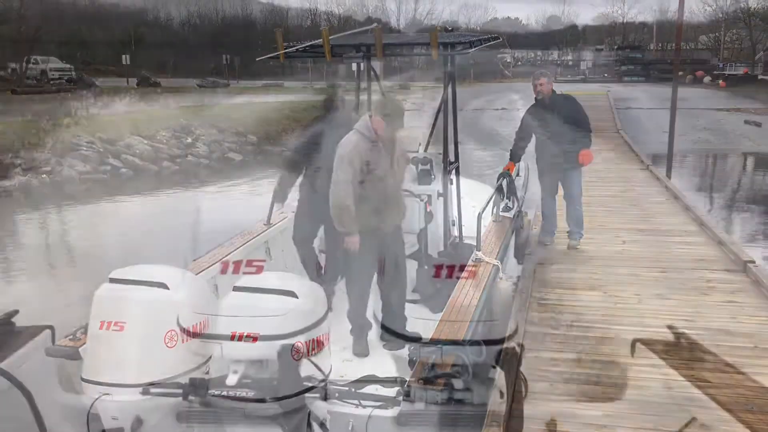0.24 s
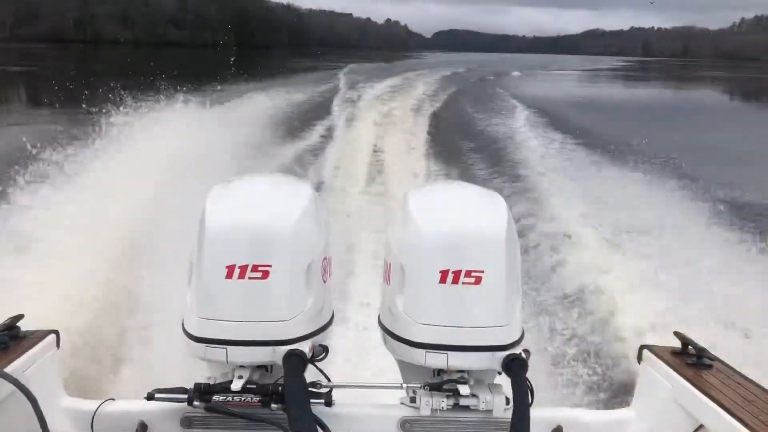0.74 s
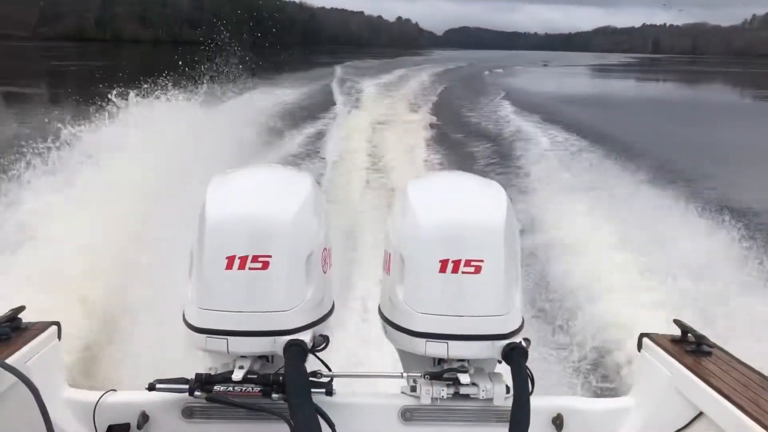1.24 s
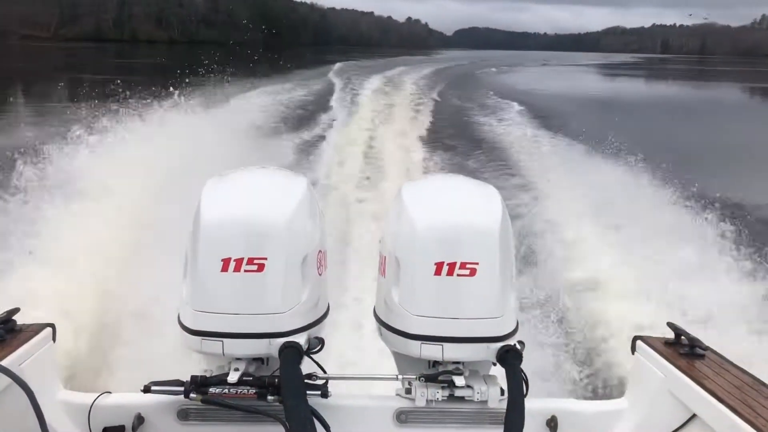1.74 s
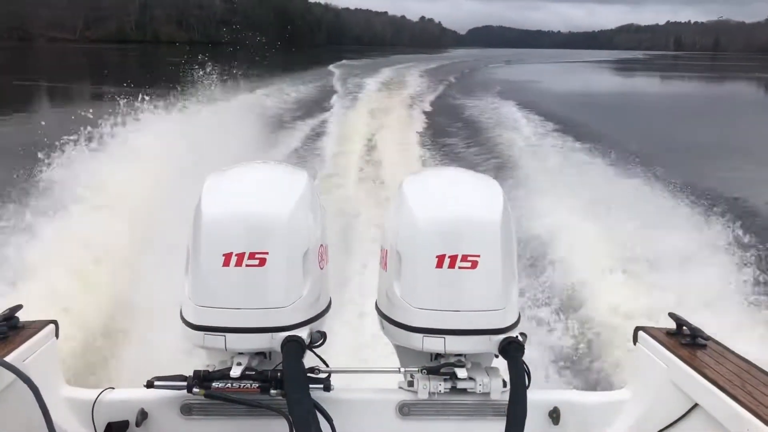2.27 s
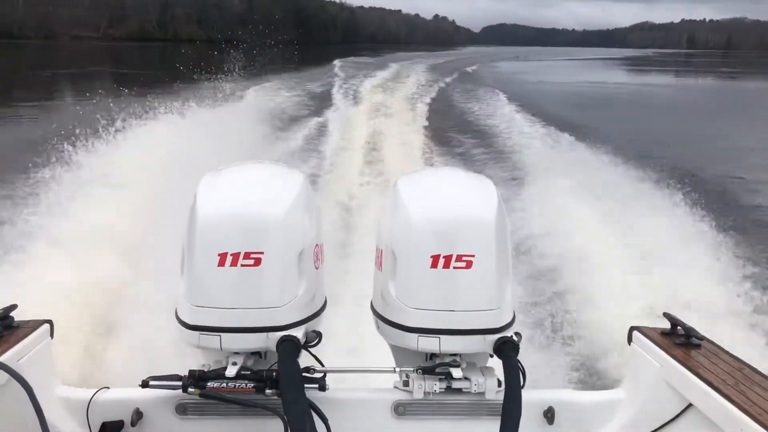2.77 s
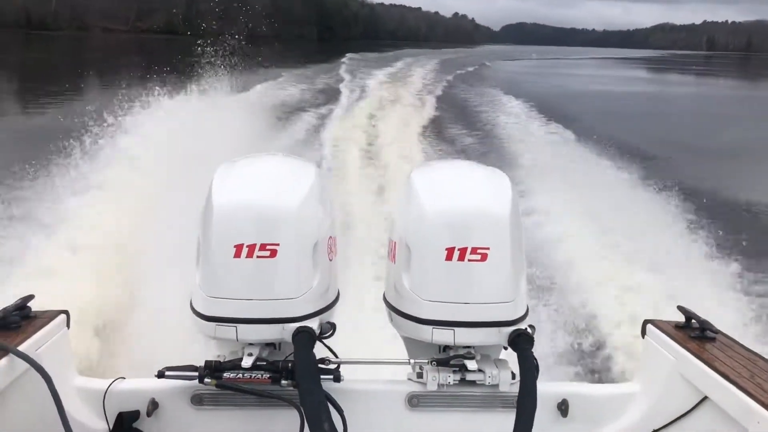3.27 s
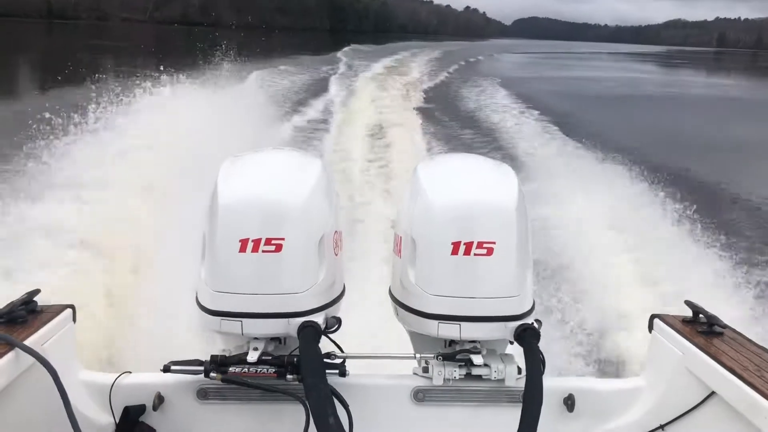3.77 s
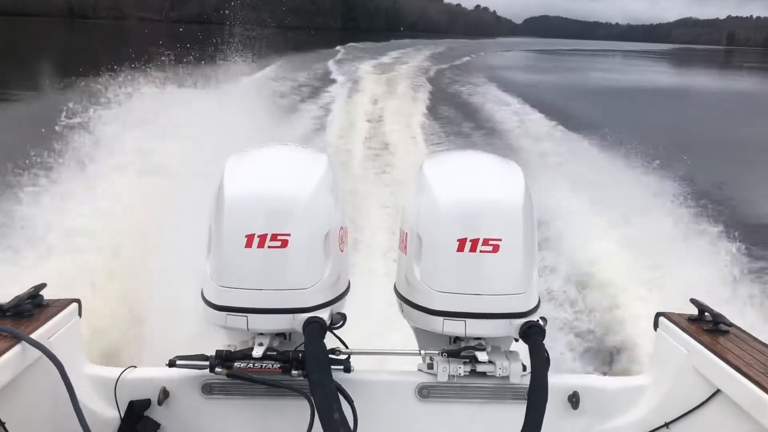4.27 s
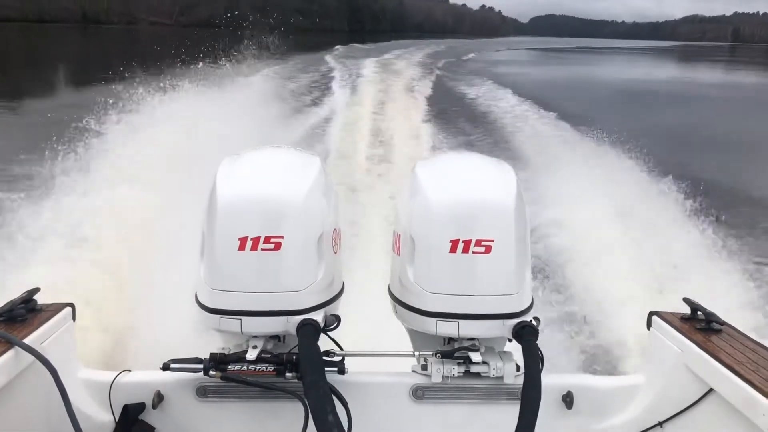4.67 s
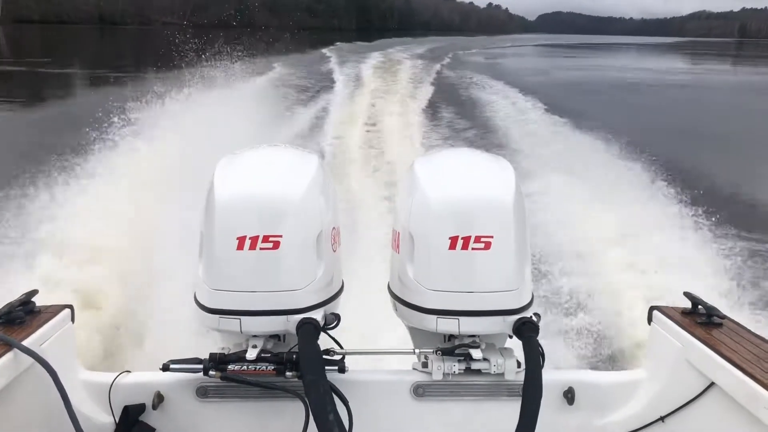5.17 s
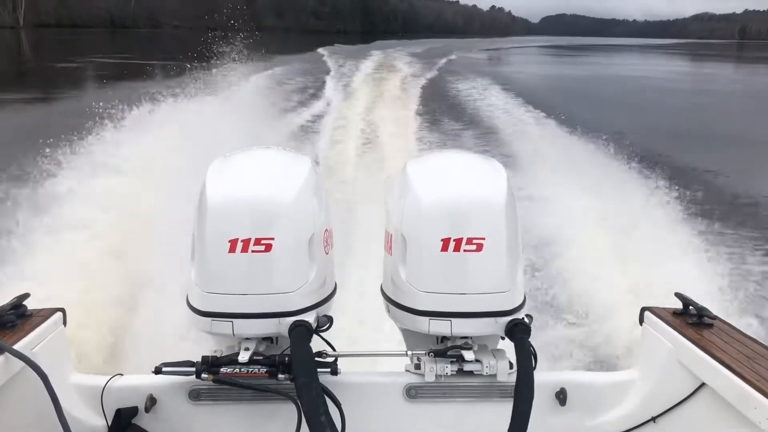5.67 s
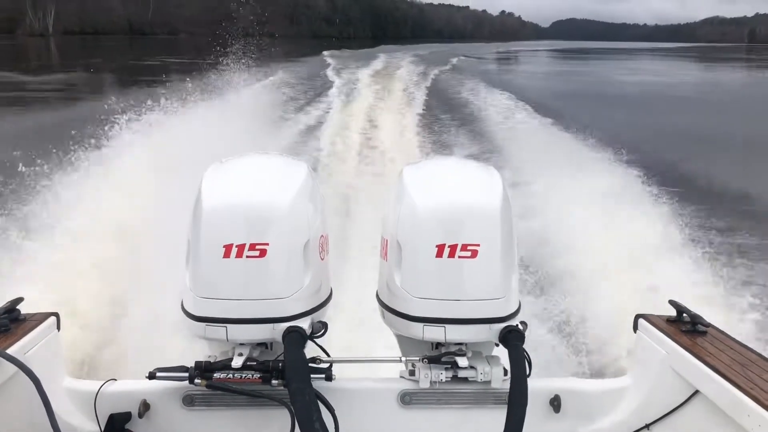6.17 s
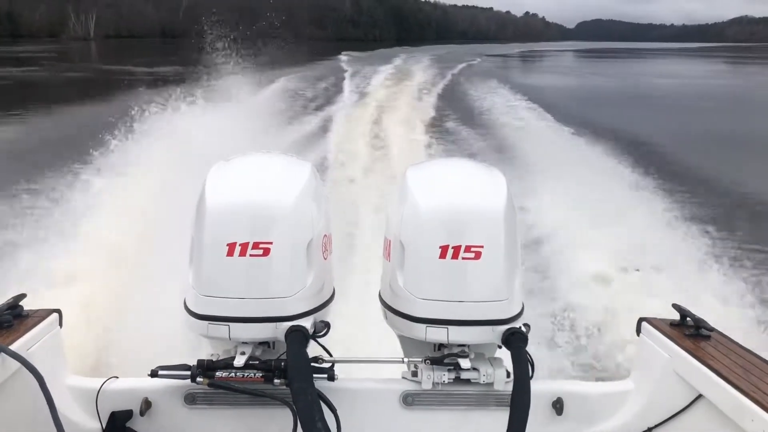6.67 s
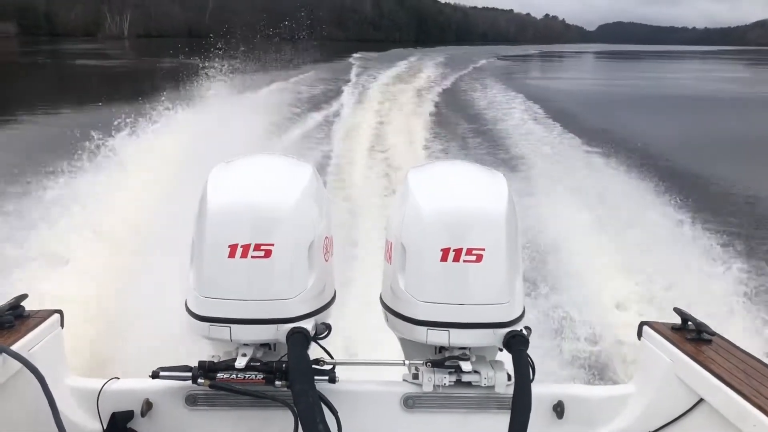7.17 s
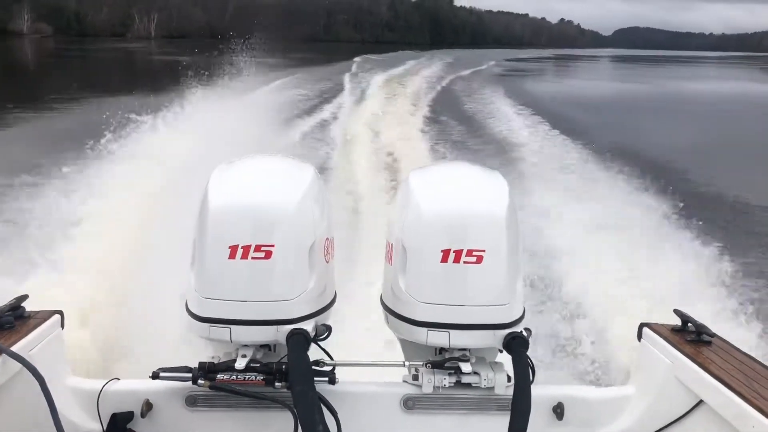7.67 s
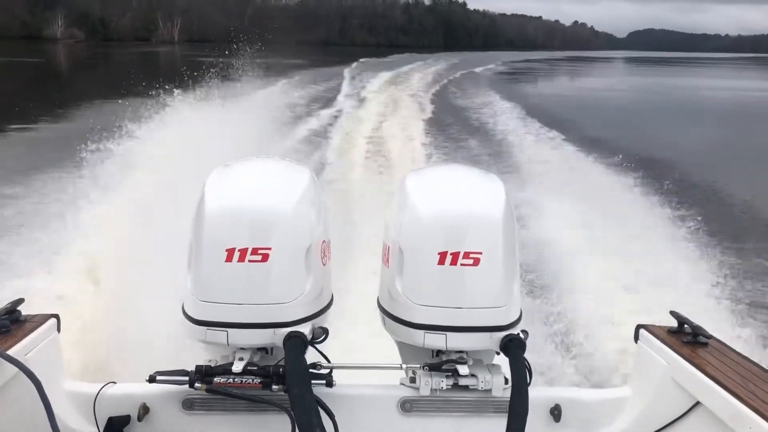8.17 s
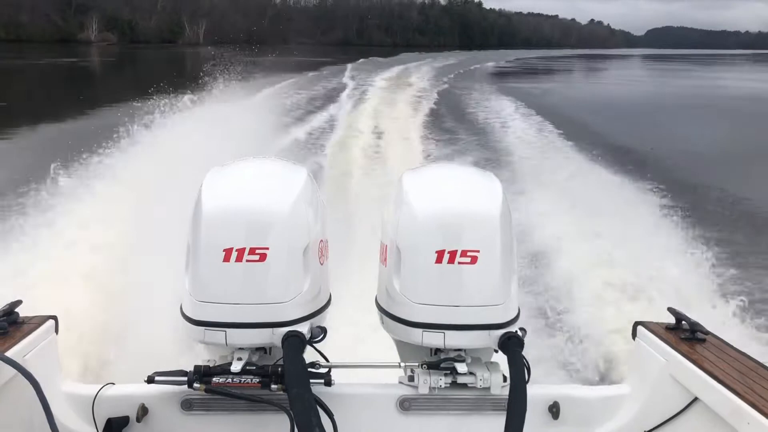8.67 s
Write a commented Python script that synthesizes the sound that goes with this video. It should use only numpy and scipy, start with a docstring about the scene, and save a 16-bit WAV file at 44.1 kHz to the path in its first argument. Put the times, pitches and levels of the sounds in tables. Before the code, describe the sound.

Two outboard motors run hard on a moving boat, heard close on deck. Their low drone quickly swells in, throbbing about once a second as slightly different pitches beat. Wash roars and spray hisses around a raspy mechanical buzz. After about three seconds the machinery and water ease while the pitch creeps up. Wind thumps and flutters irregularly on the microphone.

```python
"""Two four-cylinder outboard motors drive a boat at speed, heard from on board.
The sound fades in over the first 0.7 s while the hull ploughs and the motors are heavily loaded; wind
buffets then set in. Around 3 s the hull lifts: machinery, wash and spray ease as the crank speed creeps up.
Throughout, exhaust tones of slightly unequal pitch beat about once a second, sums of crank orders make
the machinery, and filtered noise makes the wash, the spray hiss and the wind at the microphone."""
import sys
import numpy as np
from scipy import signal
from scipy.fft import rfft, irfft, next_fast_len
from scipy.io import wavfile

SR = 44100
rng = np.random.default_rng(int(sys.argv[2]) if len(sys.argv) > 2 else 0)


def wav_record(signal):
    """Record a signal, one row per channel, as 16-bit PCM in the file named by sys.argv[1]."""
    frames = np.transpose(np.atleast_2d(signal))
    bounded = np.clip(frames, -1, 1)
    # unit amplitude maps onto the largest positive 16-bit level
    quanta = np.round(bounded * 32767).astype(np.int16)
    wavfile.write(sys.argv[1], SR, quanta)


N = 393813
TIME_S = np.arange(N) / SR
CYLINDER_FIRINGS = 4  # firings per crank turn


def from_db(db):
    """Level law: decibels to amplitude gain."""
    return 10 ** (np.asarray(db) / 20)


def rms_one(x):
    """Normalisation: scale to unit rms."""
    return x / np.sqrt(np.mean(x ** 2) + 1e-20)


def drift(rate_hz):
    """Low-passed noise: two equal poles at rate_hz leave a smooth random wander of unit rms."""
    step = 40  # samples between the points of the slow wander
    pole = np.exp(-2 * np.pi * rate_hz * step / SR)
    noise = rng.standard_normal(N // step + 2002)
    slow = signal.lfilter([1], [1, -2 * pole, pole ** 2], noise)[2000:]  # drop the filter's start
    return np.interp(np.arange(N) / step, np.arange(len(slow)), rms_one(slow))


def coloured(x, spectrum):
    """Spectral shaping: a smooth curve over log frequency, falling 20 dB per octave past its ends; rms 1."""
    size = next_fast_len(N)
    octave = np.log2(np.maximum(np.arange(size // 2 + 1) * SR / size, 1))
    hz, db = np.transpose(spectrum)
    curve_octave = np.log2(hz)
    outside = np.abs(octave - np.clip(octave, curve_octave[0], curve_octave[-1]))
    gain = from_db(np.interp(octave, curve_octave, db) - 20 * outside)
    return rms_one(irfft(rfft(x, size) * gain, size)[:N])


def fade_in(from_level_db=-11, length_s=0.71):
    """Amplitude envelope: gain rises in a straight line to 1."""
    return np.interp(TIME_S, [0, length_s], [from_db(from_level_db), 1])


def load(lift_at_s=3.08, lift_s=0.89):
    """Logistic change of drag: load near 1 while the hull ploughs, falling to 0 once it runs free."""
    return 1 / (1 + np.exp((TIME_S - lift_at_s) / lift_s))


def crank_speed(start_hz=45.5, top_hz=48.3, speed_up_s=3.45):
    """Exponential approach: mean turns per second of the two motors close in on top speed."""
    return top_hz - (top_hz - start_hz) * np.exp(-TIME_S / speed_up_s)


# Beat minima, where the two exhaust drones oppose in phase; the faster motor gains one firing between
# neighbours. Each entry: time in seconds.
BEAT_MINIMA = [-0.1, 0.66, 1.49, 2.21, 3.04, 3.96, 4.97, 6.14, 6.99, 8.03, 9.2]


def crank_angles(hunt_hz=0.08):
    """Phase is the integral of speed: one crank runs ahead of the slightly hunting mean, one behind."""
    mean_turns = np.cumsum(crank_speed() + hunt_hz * drift(2.57)) / SR + rng.random()
    lead_firings = np.interp(TIME_S, BEAT_MINIMA, np.arange(len(BEAT_MINIMA)) - .5)
    half_lead = lead_firings / CYLINDER_FIRINGS / 2
    return 2 * np.pi * (mean_turns + half_lead), 2 * np.pi * (mean_turns - half_lead)


def eddies(per_s=4.0, rumble_db=-26, flutter_db=-26, spread_db=2.0, slow_db=4.5, first_s=0.71):
    """Random turbulence: small eddies at uneven intervals; under full load their rumble loses slow_db."""
    draws = rng.standard_normal((100, 3))
    start_s = (np.arange(len(draws)) + .5 * draws[:, 0]) / per_s
    load_loss_db = slow_db * np.interp(start_s, TIME_S, load())
    low_db = rumble_db - load_loss_db + spread_db * draws[:, 1]
    mid_db = flutter_db + spread_db * draws[:, 2]
    rows = np.column_stack([start_s, low_db, mid_db])
    return rows[(start_s > first_s) & (start_s < N / SR)]


# Strong wind buffets. Each row: centre in seconds, rumble swell in dB, flutter swell in dB, both before
# the raggedness and the wind's own gains.
WIND_BUFFETS = [(0.9, -14, -25), (1.07, -18, -20), (1.33, -13, -16.5), (1.57, -23, -22), (2.43, -28, -16),
                (3.18, -17, -14), (4.25, -23, -21), (4.92, -20, -18.5), (5.29, -14, -22),
                (5.58, -23, -21.5), (6.02, -15.5, -29), (6.29, -13, -22.5), (6.43, -21, -30),
                (6.83, -16.5, -18), (6.99, -15.5, -17), (7.11, -20, -27), (7.32, -20, -20),
                (7.42, -18, -20), (7.52, -13, -17), (7.62, -17, -19.5), (8.26, -13, -22.5),
                (8.72, -20, -17)]


def gusts(length_s=0.018, ragged_db=2.0, ragged_hz=46):
    """Energy addition: Gaussian swells sum in power; smaller whirls inside them make the level jump."""
    rumble, flutter = np.zeros(N), np.zeros(N)
    for centre_s, low_db, mid_db in [*WIND_BUFFETS, *eddies()]:
        near = slice(max(int((centre_s - .1) * SR), 0), int((centre_s + .1) * SR))
        swell = np.exp(-.5 * ((TIME_S[near] - centre_s) / length_s) ** 2)
        rumble[near] = np.hypot(rumble[near], from_db(low_db) * swell)
        flutter[near] = np.hypot(flutter[near], from_db(mid_db) * swell)
    return [level * from_db(ragged_db * np.minimum(drift(ragged_hz), 1)) for level in (rumble, flutter)]


# Noise spectra of the wind's rumble and flutter. Each row: frequency in Hz, relative density in dB per Hz.
RUMBLE_SPECTRUM = [(20, -40), (32, -19), (48, -7.5), (70, -1.5), (105, -4.5), (140, 3), (200, -0.5),
                   (290, -2.5), (400, -12), (800, -32)]
FLUTTER_SPECTRUM = [(100, -16), (220, -0.5), (330, -4), (520, 1), (720, -6), (1000, -10.5), (1600, -18),
                    (3000, -29.5)]


def wind(fade, rumble, flutter, rumble_db=-1.5, flutter_db=-0.64, steady_db=-29.0, lumpy_db=2.5,
         crackle_db=4.6):
    """Turbulent pressure at the microphone: a lumpy rumble, and in each buffet a burst of small pops."""
    steady = fade * from_db(steady_db + lumpy_db * drift(13.0))
    rumble_level = np.hypot(steady, from_db(rumble_db) * rumble)
    low = rumble_level * coloured(rng.standard_normal(N), RUMBLE_SPECTRUM)
    pops = rng.standard_normal(N) * from_db(crackle_db * np.minimum(drift(145), 2))
    return low + from_db(flutter_db) * flutter * coloured(pops, FLUTTER_SPECTRUM)


def pulsing_noise(angles, depth):
    """Amplitude modulation: noise swells once and twice per turn of each crank."""
    swell = 0
    for angle in angles:
        for multiple in (1, 2):
            swell = swell + np.cos(multiple * angle + rng.uniform(0, 2 * np.pi))
    return rng.standard_normal(N) * (1 + depth * swell)


# Spectrum of the spray. Each row: frequency in Hz, relative density in dB per Hz.
SPRAY_SPECTRUM = [(1500, -14.5), (3000, -9.5), (3800, -7), (4400, -8), (5400, -4), (5900, -2), (6500, -.5),
                  (6900, -4), (8100, -6.5), (8800, -11), (11500, -12.5), (13500, -11), (15800, -13.5)]
# Narrow ringing bands of the motors. Each row: centre in Hz, width in Hz, mean level in dB relative to
# the spray, about which it wavers.
WHINE_BANDS = [(6460, 50, -16), (5920, 160, -14), (6160, 320, -11)]


def spray(angles, flicker_db=0.6, grain_db=0.7, whine_waver_db=4.5):
    """Broadband noise and resonance: dense droplets and motor hiss, with thin metallic whines that surge."""
    droplet_level = from_db(flicker_db * drift(9.8) + grain_db * drift(300))
    out = coloured(pulsing_noise(angles, depth=.02) * droplet_level, SPRAY_SPECTRUM)
    for hz, width_hz, db in WHINE_BANDS:
        pole = np.exp(-np.pi * width_hz / SR)
        resonator = [1, -2 * pole * np.cos(2 * np.pi * hz / SR), pole ** 2]
        ring = signal.lfilter([1, 0, -1], resonator, pulsing_noise(angles, depth=.12))
        out = out + from_db(db + whine_waver_db * drift(6)) * rms_one(ring)
    return out


def deck_echoes(x, echo_db=-26.0, longest_s=0.0062, count=14):
    """Comb interference: short reflections off deck and transom ripple the spectrum; rms 1."""
    lags = (rng.uniform(longest_s / 10, longest_s, count) * SR).astype(int)
    echoes = sum(np.pad(x, (lag, 0))[:N] for lag in lags)
    return rms_one(x + from_db(echo_db) * echoes)


# Spectrum of the churning wash. Each row: frequency in Hz, relative density in dB per Hz.
WASH_SPECTRUM = [(150, 5), (300, 1.5), (500, -3), (680, -6.5), (950, -0.5), (1250, -5.5), (1700, -8),
                 (2200, -14.5), (2900, -23.5), (4500, -35)]


def wash(angles):
    """Modulated broadband noise: churned water pulses faintly with the cranks; rms 1."""
    return coloured(pulsing_noise(angles, depth=0.047), WASH_SPECTRUM)


def revolution(angle, orders, levels_db):
    """Fourier synthesis: one cycle's pressure wave is summed from its orders and read at the angle."""
    turn = np.linspace(0, 2 * np.pi, 4097)
    phases = rng.uniform(0, 2 * np.pi, len(orders))
    harmonics = np.cos(np.outer(orders, turn) + phases[:, None])
    wave = np.sqrt(2) * from_db(levels_db) @ harmonics
    return np.interp(angle % (2 * np.pi), turn, wave)


# Envelope of the valve gear's comb. Each row: frequency in Hz, level in dB per line before scatter, cowl
# colouring and machine gain.
VALVE_ENVELOPE = [(1400, -63), (1700, -61.5), (2200, -64), (2800, -60.5), (3200, -79.5), (4700, -72)]


def valve_rasp(angles, scatter_db=2.0, jitter=0.0062):
    """Subharmonic comb: valve gear repeats every second turn, so its fine lines lie at half crank orders."""
    orders = np.arange(60, 200)
    line_hz = orders * np.mean(crank_speed()) / 2
    envelope_db = np.interp(line_hz, *np.transpose(VALVE_ENVELOPE))
    out = 0
    for angle in angles:
        uneven = angle / 2 + jitter * drift(7.1)  # radians
        levels_db = envelope_db + scatter_db * rng.standard_normal(len(orders))
        out = out + revolution(uneven, orders, levels_db)
    return out


# Crank orders that stand out. Each row: multiple of crank speed, faster motor in dB, slower motor in dB,
# both before the gains of the machinery.
PROMINENT_ORDERS = [(6, -38.5, -34), (8, -34, -40), (12, -45, -39.5), (15, -41.5, -43.5), (17, -44.5, -43),
                    (19, -42, -39), (20, -33, -36.5), (21, -47.5, -38), (23, -38.5, -37.5), (26, -42, -41),
                    (27, -40, -38), (32, -46, -40), (35, -57, -43), (45, -46.5, -61)]
# Smooth bed of the other orders. Each row: multiple of crank speed, level in dB before the same gains.
BED_CURVE = [(5, -45), (7, -63), (9, -48.5), (11, -49.5), (14, -51), (16, -47), (18, -44), (24, -42.5),
             (28, -43), (33, -54.5), (36, -49), (41, -52.5), (48, -59.5), (52, -54)]


def order_levels(top_order=52):
    """Order spectrum: rows of order and both motors' dB, with prominent orders set into the bed."""
    prominent = {round(order): levels for order, *levels in PROMINENT_ORDERS}
    bed = np.transpose(BED_CURVE)
    rows = []
    for order in range(CYLINDER_FIRINGS + 1, top_order + 1):
        bed_db = np.interp(order, *bed)
        rows.append((order, *prominent.get(order, [bed_db, bed_db])))
    return np.array(rows)


def machinery(angles, fade, high_gain, jitter=0.0074, waver_db=2.0, exhaust_db=0.9, count=3,
              overtone_db=-2.5, overtone_load_db=10):
    """Harmonic sources: low orders from the exhausts, high from under the cowls; groups waver apart."""
    table = order_levels()
    orders = np.round(table[:, 0])
    low = orders <= 3 * CYLINDER_FIRINGS
    firing = orders % CYLINDER_FIRINGS == 0
    # load sharpens the exhaust pulses, which lifts the multiples of the firing rate
    load_db = overtone_db + overtone_load_db * load()
    out = 0
    for angle, levels_db in zip(angles, table[:, 1:].T):
        for group, db in ((low & firing, load_db), (low & ~firing, exhaust_db)):
            gain = fade * from_db(db + waver_db * drift(5.8))
            out = out + gain * revolution(angle, orders[group], levels_db[group])
        for k in range(count):
            group = ~low & (orders % count == k)  # interleaved orders
            uneven = angle + jitter * drift(8.4)  # radians
            gain = high_gain * from_db(waver_db * drift(7.8))
            out = out + gain * revolution(uneven, orders[group], levels_db[group])
    return out


# Cowl resonances that the orders slide through as the speed creeps up. Each row: centre in Hz, width in
# Hz, gain of that filter at its centre in dB.
COWL_RESONANCES = [(720, 23, -4.5), (809, 15, 5), (1256, 23, 3), (1306, 27, -8), (1400, 19, 1.5),
                   (1512, 32, -5), (1530, 28, 2), (1704, 30, 0), (2150, 17, 2.5)]


def cowl(x):
    """Resonant transmission: narrow peaks and dips in series colour the machinery."""
    for hz, width_hz, db in COWL_RESONANCES:
        band = signal.lfilter(*signal.iirpeak(hz, hz / width_hz, fs=SR), x)
        x = x + (from_db(db) - 1) * band
    return x


# Exhaust drone. Each row: time in seconds, level of the faster motor's firing tone in dB before fade,
# waver and shaking.
DRONE_LEVEL = [(0, -13), (0.45, -13.5), (0.9, -13), (3.4, -12.5), (8.93, -14)]


def exhausts(angles, buffeting, slower_db=-2.0, waver_db=0.4, shake_db=1.1):
    """Beating: tones at two close firing rates swell and cancel in sum, and gusts shake the level."""
    level_db = np.interp(TIME_S, *np.transpose(DRONE_LEVEL))
    tones = 0
    for angle, db in zip(angles, (0, slower_db)):
        tones = tones + from_db(db + waver_db * drift(13)) * np.cos(CYLINDER_FIRINGS * angle)
    gust_strength = np.sqrt(buffeting / buffeting.max())
    shaken = from_db(shake_db * gust_strength * drift(47))
    return np.sqrt(2) * from_db(level_db) * shaken * tones


def scene(high_orders_db=2.0, wash_db=-3.5, machine_db=-23.5, machine_load_db=5,
          spray_db=-31.5, spray_load_db=4.5):
    """Superposition: wind, spray, wash and motors add at one microphone; load raises the last three."""
    fade, angles = fade_in(), crank_angles()
    rumble, flutter = gusts()
    air = wind(fade, rumble, flutter)
    hiss = fade * from_db(spray_db + spray_load_db * load()) * deck_echoes(spray(angles))
    machine = fade * from_db(machine_db + machine_load_db * load())
    water = machine * from_db(wash_db) * wash(angles)
    machine_shape = rms_one(machine)  # the same rise and fall, at unit rms
    orders = machinery(angles, fade, machine_shape * from_db(high_orders_db))
    motors = cowl(orders + machine_shape * valve_rasp(angles))
    drone = fade * exhausts(angles, rumble + flutter)
    return (air + hiss + water + motors + drone)[None]


def record(dry, cutoff_hz=15800):
    """Clipping and band limitation: peaks stop at full scale, then a steep low-pass cuts the top."""
    low_pass = signal.ellip(14, .1, 100, cutoff_hz, fs=SR, output="sos")
    return signal.sosfilt(low_pass, np.clip(dry, -1, 1))


dry = scene()
out = record(dry)
wav_record(out)
```